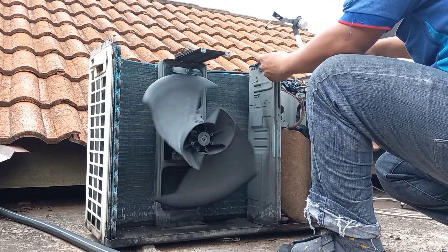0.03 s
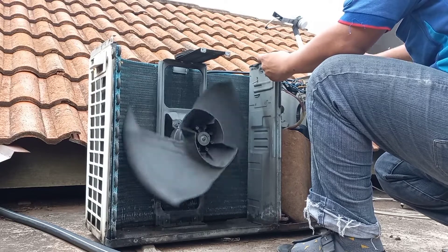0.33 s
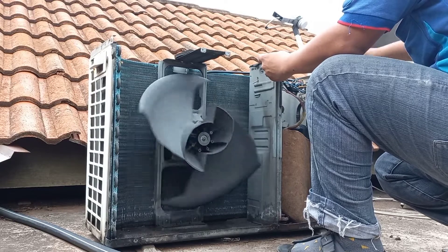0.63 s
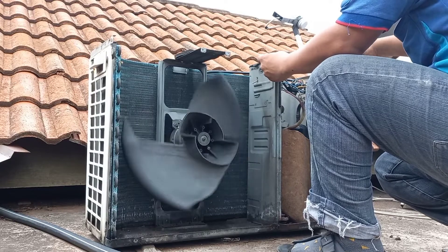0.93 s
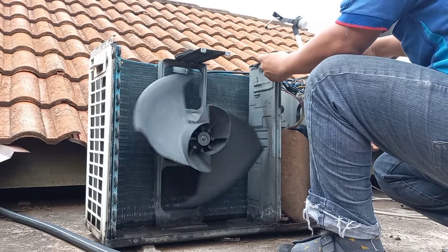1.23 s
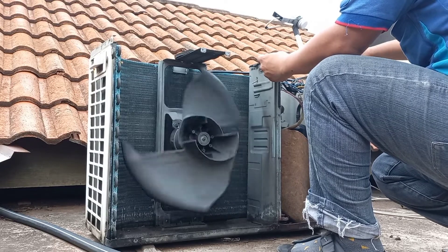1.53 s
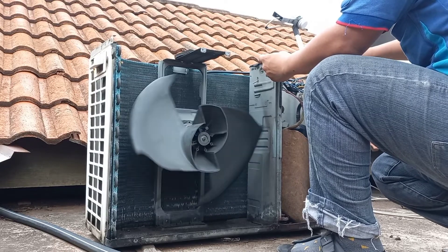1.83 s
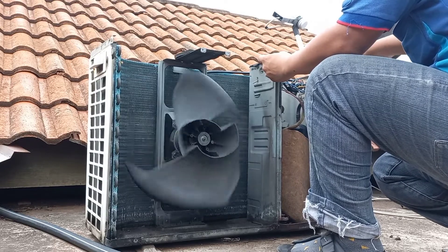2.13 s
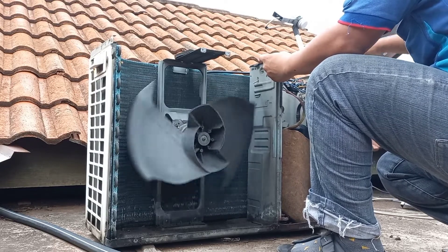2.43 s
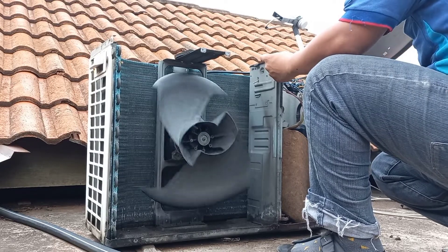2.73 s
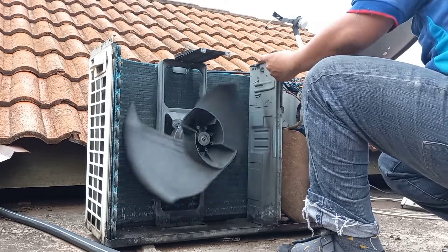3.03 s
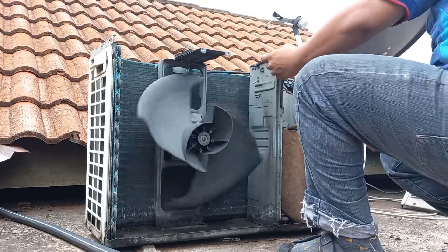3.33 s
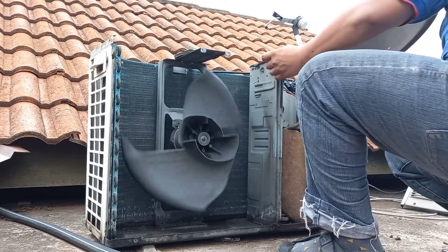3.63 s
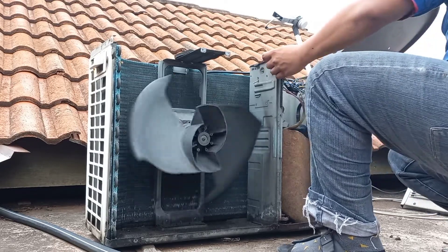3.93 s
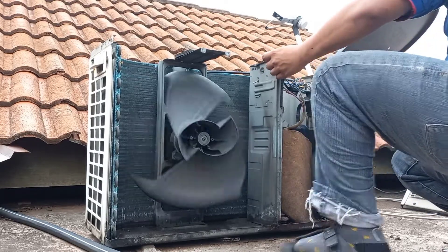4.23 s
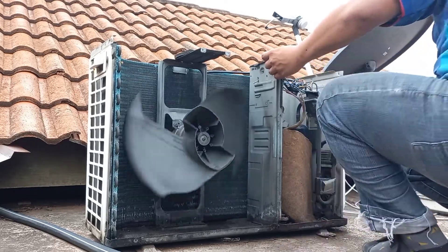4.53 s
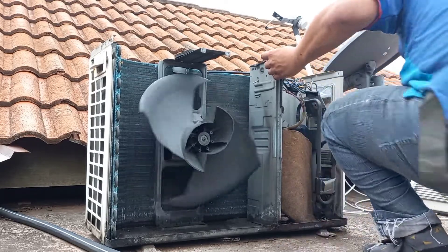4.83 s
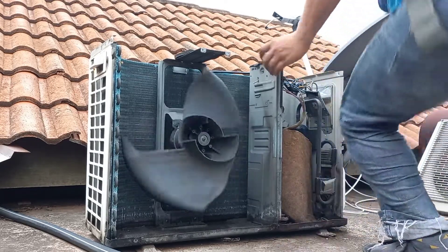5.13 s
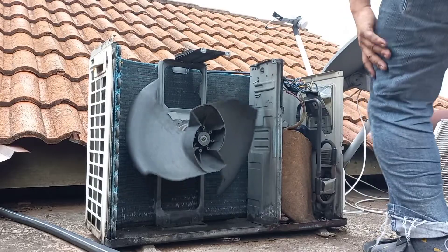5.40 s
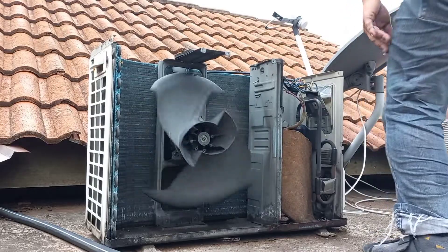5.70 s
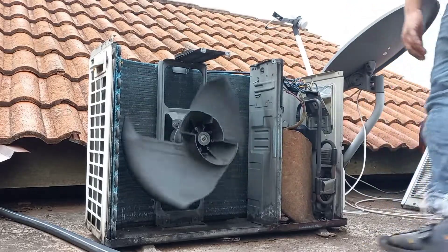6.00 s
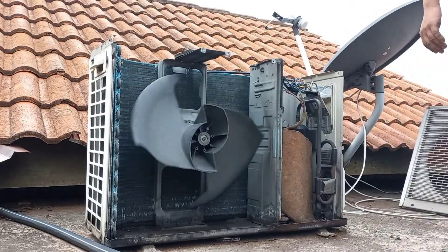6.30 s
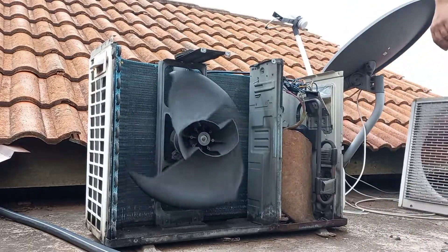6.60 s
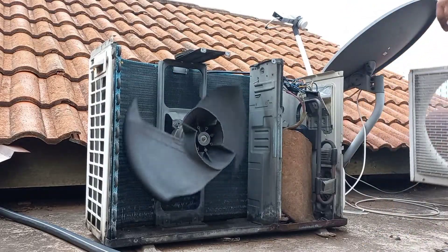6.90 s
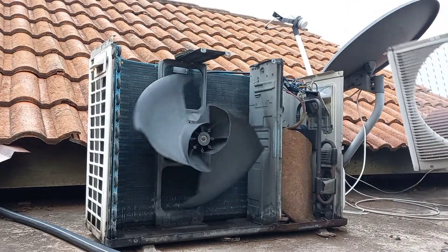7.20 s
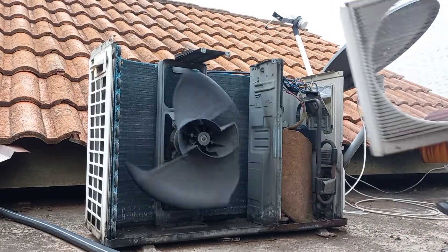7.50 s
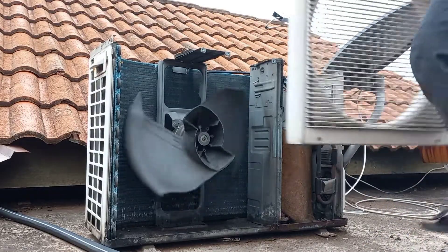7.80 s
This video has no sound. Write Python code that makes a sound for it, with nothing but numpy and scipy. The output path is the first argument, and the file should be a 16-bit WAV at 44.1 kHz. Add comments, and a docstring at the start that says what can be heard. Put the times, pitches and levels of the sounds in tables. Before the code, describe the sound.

Close thumps, clinks and sheet-metal clatter from work on a rooftop air conditioner, ending with scuffing shoes and a grille dragged with ringing bangs.

```python
"""A distant town rumbles around an open roof, with soft, dull thumps close to a stereo microphone.
Kneeling at an open air-conditioner unit, a worker bumps its cabinet, and small metal parts clink in his
hand. He rises, a loose panel clatters, and his soles scuff the sandy concrete. Then he drags a sheet-metal
grille away: it bangs, sticks and slips, and rings out. A machine hums nearby; a bird whistles once."""
import sys
import numpy as np
from scipy import signal
from scipy.fft import rfft, irfft, next_fast_len
from scipy.io import wavfile
from scipy.ndimage import map_coordinates

SR = 44100
rng = np.random.default_rng(int(sys.argv[2]) if len(sys.argv) > 2 else 0)


def waveform_to_disk(signal):
    """Save audio, clipped to [-1, 1], as 16-bit WAV at the path in sys.argv[1]."""
    frames = np.transpose(np.atleast_2d(signal))
    scaled = np.clip(frames, -1, 1) * 32767
    samples = np.round(scaled).astype(np.int16)
    wavfile.write(sys.argv[1], SR, samples)


N = 350595

# The grille's frame hits the concrete. Each row: start in seconds, body level in dB, edge level in dB.
GRILLE_BANGS = [(6.241, -34.5, -24), (6.261, -22.5, -29), (6.328, -17.5, -15), (6.383, -18.5, -23.5),
                (6.482, -24.5, -27.5), (6.657, -30, -31), (6.745, -45, -39.5), (7.032, -44, -59)]
# Pulls on the grille. Each row: start in seconds, hardest moment in seconds, level in dB.
GRILLE_PULLS = [(6.255, 6.49, -19), (7.03, 7.143, -55)]
# The side panel strikes its frame. Each row: start in seconds, body level in dB, edge level in dB.
PANEL_BLOWS = [(4.519, -33, -30.5), (4.529, -32.5, -51), (4.579, -18.5, -17), (4.607, -22.5, -24),
               (4.695, -41, -38), (4.794, -30.5, -30.5), (4.82, -29.5, -30), (4.991, -30, -36.5),
               (5.237, -46.5, -57)]
# Bumps on the cabinet. Each row: start in seconds, body and edge levels in dB, decay time in seconds.
CABINET_KNOCKS = [(.792, -48.5, -48, 0.3), (2.659, -18, -24, 0.2), (2.682, -23.5, -41, 0.2),
                  (4.112, -30.5, -61, 0.41)]
# Small contacts close to the microphone. Each row: start in seconds, level in dB.
STEEL_CLINKS = [(3.119, -30.5), (3.145, -26), (3.174, -31.5), (3.216, -38), (3.244, -37), (4.582, -22),
                (6.385, -20), (6.867, -36)]
DRY_TAPS = [(1.55, -48), (2.026, -47), (3.034, -31.5), (3.0823, -40.5), (4.1139, -24), (4.413, -43.5),
            (4.766, -33.5), (5.359, -34.5)]
HOLLOW_KNOCKS = [(3.671, -44), (4.241, -33.5), (5.359, -39), (5.815, -48.5), (5.985, -40), (7.542, -56.5),
                 (7.635, -58.5), (7.8121, -48.5)]
DULL_THUMPS = [(0.269, -39), (1.027, -41.5), (1.396, -42.5), (1.777, -40), (2.359, -42.5), (2.408, -36.5),
               (2.489, -40.5), (4.111, -25), (4.526, -27.5), (4.696, -28.5), (5.812, -42)]
# Shoes scuff the roof. Each row: start and length in seconds, sole level in dB, grit level in dB.
SHOE_SCUFFS = [(0.21, .14, -74, -74.5), (1.133, 0.17, -57.5, -70), (3.628, 0.27, -39, -77),
               (4.177, 0.21, -42.5, -59), (5.292, 0.17, -49, -60.5), (5.735, 0.44, -61, -68.5),
               (5.954, 0.23, -47.5, -70), (6.111, 0.59, -39.5, -50.5)]
# Single modes that stand out of the metal. Each row: frequency in Hz, level in dB.
GRILLE_RING = [(489, -7), (577, -1.5), (726, -2), (799, 1.5), (920, -5), (1326, -3), (1405, -6), (1469, -5),
               (1701, -1), (1870, -8), (2158, -4.5), (2395, -6), (2467, -8.5)]
PANEL_RING = [(611, 2.5), (1176, 5), (1387, 3.5), (1703, -0.5), (2105, -0.5), (2316, 0.5), (2449, -1.5),
              (2900, -8), (3671, -14), (3849, -8.5), (5030, -5.5)]
CABINET_RING = [(274, 1.5), (312, -5.5), (382, -1.5), (527, 0.5), (748, -8.5), (1224, -7), (1490, -8.5),
                (2200, -4)]
STEEL_RING = [(2350, -12), (3570, -9.5), (4772, -3.5), (5243, -7), (6244, -2.5), (6626, -7.5), (7565, -7),
              (9600, -9), (12900, 4), (13150, -3), (14850, -5.5)]
# The dense resonances of each sheet-metal body. Each row: frequency in Hz, spectral level in dB.
GRILLE_BODY = [(90, -49.5), (200, -7), (350, -22), (520, -7), (800, 1), (1100, -7), (1500, -0.5),
               (2000, -9.5), (2500, -11), (3600, -20.5), (6000, -29.5)]
PANEL_BODY = [(150, -8), (300, -13.5), (450, -8), (650, 2), (1000, -8.5), (1400, -3.5), (1900, -7),
              (2400, -6), (3200, -17), (6000, -22)]
CABINET_BODY = [(90, -14), (190, -2.5), (300, 6.5), (480, -2.5), (800, -4.5), (1400, -6.5), (2300, -15.5),
                (3500, -27.5), (6000, -36)]
# Noise colours of the close contacts and the far town. Each row: frequency in Hz, spectral level in dB.
EDGE_COLOUR = [(1800, -3), (3500, -3), (4800, -5), (8000, -3), (11000, -3.5), (13000, -3.5), (15500, -12.5)]
TAP_COLOUR = [(700, -15), (2200, 5.5), (4000, -1), (8000, -6), (15000, -26.5)]
HOLLOW_COLOUR = [(500, -14), (1500, 2.5), (2500, -4.5), (4200, -24), (12000, -16)]
DULL_COLOUR = [(120, -21.5), (250, 7.5), (750, 3.5), (1100, -4), (1500, -0.5), (4000, -21.5), (9000, -28.5)]
GRIT_COLOUR = [(1500, -26.5), (3500, 6), (7000, 6.5), (12000, 0.5), (15500, -6)]
TOWN_COLOUR = [(25, -29.5), (52, -11.5), (75, -10), (93, 0.5), (163, -7.5), (286, -8.5), (450, -11.5),
               (790, -25.5), (1460, -31.5), (2500, -52), (5000, -56), (15000, -57)]
# The tones of the nearby machine. Each row: frequency in Hz, level in dB.
HUM_TONES = [(457.5, -69), (484.5, -60.5)]
# How alike near and far sounds are left and right. Each row: frequency in Hz, likeness from 0 to 1.
NEAR_LIKENESS = [(200, 0.97), (800, 0.69), (2000, 0.53), (4000, 0.083), (12000, 0.2)]
FAR_LIKENESS = [(80, 0.98), (300, 0.82), (700, 0.25), (1500, 0.074), (8000, .2)]
# The microphone's lean to the left. Each row: frequency in Hz, left minus right in dB.
LEFT_BIAS = [(100, 1), (350, 4), (800, 2), (2300, 1.5), (5000, 0.5), (13000, 4.5)]

TIPPED_S, STANDING_T60_S, TIPPED_T60_S = 6.3, 0.47, 0.85  # tipped off the ground, the grille rings longer
LINGER_HZ, LINGER_DB, LINGER_T60_S = 805, -31, 2  # the grille's longest mode
PULL_DB_PER_S, EASE_DB_PER_S = 32.5, 62  # the judder swells, then eases as the weight leaves the ground
SAND_DB, SAND_CLEARS_DB_PER_S = -11, 59  # sand cracks most at the start of a pull
LET_GO_S, HELD_T60_S, FREE_T60_S = 4.75, 0.27, 0.63  # the hand damps the panel until it lets go
CLINK_T60_S = 0.18
SOFT_THUMP_HZ, FIRM_THUMP_DB, FIRMING = 740, -30.5, 9.5  # the cutoff climbs steeply on a firm thump
TOWN_DB, DRONE_DB = -47.5, -52  # far rumble and its deep drone
# The background rumble dips after the loud bangs, then recovers.
DIP_START_S, DIP_BOTTOM_S, DIP_DB, RECOVER_DB_PER_S = 6.2, 7.36, 11.5, 11.5
DRONE_DIPS, HUM_DIPS = 4.2, 0.25  # times as far as the rumble, in dB
TOP_HZ = 15500  # the microphone's band limit


def grille():
    """Close by, the frame bangs down, then sticks and slips over the concrete; one mode lingers."""
    blows = [(s, body_db, edge_db, STANDING_T60_S if s < TIPPED_S else TIPPED_T60_S)
             for s, body_db, edge_db in GRILLE_BANGS]
    bangs = struck(blows, GRILLE_BODY, GRILLE_RING, dense_db=0, ring_db=-4, ring_life=1.05,
                   damp_hz=1300, edge_t60=0.13, rattle_db=-12)
    add(bangs, TIPPED_S, amp(LINGER_DB) * rasp([(LINGER_HZ, 0)], LINGER_T60_S, width=.025))
    slips = np.zeros((2, N))
    for corner in range(4):  # each corner catches on its own and rings the frame differently
        body = burst(list(GRILLE_BODY) + [(9000, -37.5)], 0.03)
        modes = amp(-10) * ring(GRILLE_RING, 0.23, damp_hz=2000, detune=0.0067)
        catches = pulses(50, spread_db=-0.5)
        slips += signal.fftconvolve(catches[None], body + modes, axes=1)[:, :N]
    judder, sand = pull_gains()
    drag = judder * unit(slips) + sand * grit(600, spread_db=8.5)
    return placed(bangs + drag, NEAR_LIKENESS, lag_ms=0.371)


def pull_gains():
    """Gains of the judder, which swells and eases with each pull, and of the sand, soon swept aside."""
    t, judder, sand = np.arange(N) / SR, np.zeros(N), np.zeros(N)
    for start, hardest, db in GRILLE_PULLS:
        slack_db = np.maximum(PULL_DB_PER_S * (hardest - t), EASE_DB_PER_S * (t - hardest))
        judder += (t > start) * amp(db - slack_db)
        sand += (t > start) * amp(db + SAND_DB - SAND_CLEARS_DB_PER_S * np.abs(t - start))
    return judder, sand


def panel():
    """A loose panel near the microphone rocks and clatters as the worker gets up."""
    blows = [(s, body_db, edge_db, HELD_T60_S if s < LET_GO_S else FREE_T60_S)
             for s, body_db, edge_db in PANEL_BLOWS]
    clatter = struck(blows, PANEL_BODY, PANEL_RING, dense_db=0.5, ring_db=-3.5, ring_life=1.066,
                     damp_hz=5410, edge_t60=0.1, rattle_db=-6)
    return placed(clatter, NEAR_LIKENESS, lag_ms=0.372)


def cabinet():
    """Almost straight ahead, the heavy cabinet answers each bump with a dull, short knock."""
    knocks = struck(CABINET_KNOCKS, CABINET_BODY, CABINET_RING, dense_db=-0.5, ring_db=-0.5,
                    ring_life=1.44, damp_hz=1370, edge_t60=0.058, rattle_db=-16)
    return placed(knocks, NEAR_LIKENESS, lag_ms=0.051)


def small_parts():
    """Close up, bits of steel clink and rub; dry taps sound, and loose parts give hollow knocks."""
    out = np.zeros((2, N))
    for s, db in STEEL_CLINKS:
        chime = amp(-10) * ring(STEEL_RING, CLINK_T60_S, damp_hz=9000, detune=.008)
        rub = amp(-5) * rasp(STEEL_RING, CLINK_T60_S, width=.015)
        contact = amp(6) * rasp(STEEL_RING, .028, width=0.0078) + amp(-3.5) * burst(EDGE_COLOUR, 0.02)
        sizzle = amp(-9.5) * burst(EDGE_COLOUR, CLINK_T60_S)
        add(out, s, amp(db) * (chime + rub + contact + sizzle))
    for s, db in DRY_TAPS:
        tap = amp(-4.5) * burst(TAP_COLOUR, 0.017) + amp(-20.5) * burst(TAP_COLOUR, 0.15)
        add(out, s, amp(db) * tap)
    for s, db in HOLLOW_KNOCKS:
        add(out, s, amp(db) * burst(HOLLOW_COLOUR, 0.059))
    return placed(out, NEAR_LIKENESS, lag_ms=0.23)


def thumps():
    """Soft, dull thumps close by, then a few firmer, brighter ones."""
    out = np.zeros((2, N))
    for s, db in DULL_THUMPS:
        corner_hz = SOFT_THUMP_HZ * (1 + amp(db - FIRM_THUMP_DB) ** FIRMING)
        noise = coloured(rng.standard_normal((2, SR)), DULL_COLOUR)
        thud = filtered(noise, lambda hz: 1 / (1 + (hz / corner_hz) ** 2))
        add(out, s, amp(db) * unit(thud) * fade(0.25, attack=0.001))
    return placed(out, NEAR_LIKENESS, lag_ms=0.25)


def shoes():
    """Beside the microphone, soles scuff the sandy concrete."""
    out = np.zeros((2, N))
    rub = coloured(np.array([pulses(1500, spread_db=3), pulses(1500, spread_db=3)]), DULL_COLOUR)
    sand = grit(2700, spread_db=7.5)
    for s, length, sole_db, grit_db in SHOE_SCUFFS:
        stroke = np.clip((np.arange(N) / SR - s) / length, 0, 1)
        pressure = np.sin(np.pi * stroke ** 0.6) ** 2  # quick start, slower release
        out += pressure * (amp(sole_db) * rub + amp(grit_db) * sand)
    return placed(out, NEAR_LIKENESS, lag_ms=0.25)


def grit(rate, spread_db):
    """Sand grains crack under something sliding."""
    return coloured(np.array([pulses(rate, spread_db), pulses(rate, spread_db)]), GRIT_COLOUR)


def town():
    """Far beyond the roof, a rumble with an uneven deep drone and a thin whine."""
    dip_db = background_dip()
    rumble_gain = amp(TOWN_DB - dip_db + .6 * wobble(5))
    drone_gain = amp(DRONE_DB - DRONE_DIPS * dip_db)
    rumble = amp(2) * coloured(rng.standard_normal((2, N)), TOWN_COLOUR)
    whine = amp(-45.5) * band(7450, width_hz=500)
    drone = band(85.7, width_hz=26) * amp(0.52 * wobble(1.8))
    return placed(rumble_gain * (rumble + whine) + drone_gain * drone, FAR_LIKENESS, lag_ms=0)


def machine_hum():
    """A machine nearby runs on, its tones wavering a little."""
    t = np.arange(N) / SR
    tones = sum(amp(db + 1.5 * wobble(4)) * np.sin(2 * np.pi * hz * t + .7 * wobble(4))
                for hz, db in HUM_TONES)
    return np.sqrt(2) * tones * amp(-HUM_DIPS * background_dip())


def bird():
    """One faint, thin whistle in the centre that falls fast and levels off."""
    t = np.arange(SR // 5) / SR
    hz = 3420 + 1500 * np.exp(-t / .048)
    envelope = np.interp(t, [0, .015, .14, t[-1]], [0, 0.91, 0.2, 0.19])
    note = envelope * np.sin(2 * np.pi * np.cumsum(hz) / SR)
    out = np.zeros((2, N))
    add(out, 7.29, amp(-67.5) * np.array([note, note]))
    return out


def background_dip():
    """How far the background rumble has dipped, in dB."""
    t = np.arange(N) / SR
    fall = np.interp(t, [DIP_START_S, DIP_BOTTOM_S], [0, DIP_DB])
    return fall - RECOVER_DB_PER_S * np.maximum(t - DIP_BOTTOM_S, 0)


def struck(blows, colour, modes, dense_db, ring_db, ring_life, damp_hz, edge_t60, rattle_db):
    """Blows on sheet metal: the dense body, its clear modes, a brief bright edge and a rattle."""
    out = np.zeros((2, N))
    for s, body_db, edge_db, t60 in blows:
        dense = amp(dense_db) * burst(list(colour) + [(9000, -43.0)], t60)
        clear = amp(ring_db) * ring(modes, t60 * ring_life, damp_hz)
        edge = burst(EDGE_COLOUR, edge_t60) + amp(rattle_db) * rattle(0.65 * t60)
        add(out, s, amp(body_db) * (dense + clear) + amp(edge_db) * edge)
    return out


def rattle(t60):
    """After a blow, loose edges keep chattering against each other."""
    contacts = pulses(160, spread_db=4.5)[None, :SR]
    chatter = signal.fftconvolve(contacts, burst(EDGE_COLOUR, 0.03), axes=1)[:, :SR]
    return unit(chatter) * fade(t60)


def burst(colour, t60):
    """Countless close resonances dying together: two independent draws."""
    return coloured(rng.standard_normal((2, SR)), colour) * fade(t60)


def ring(modes, t60, damp_hz, detune=.003, scatter_db=2):
    """Clear modes, each a close beating pair, struck at new strengths every time: two draws."""
    hz, db = np.repeat(modes, 2, axis=0).T
    hz = hz * (1 + detune * rng.standard_normal(len(hz)))
    strength = amp(db + scatter_db * rng.standard_normal((2, len(hz))))
    phase = np.exp(2j * np.pi * rng.random((2, len(hz))))
    lines = np.zeros((2, SR // 2 + 1), complex)
    lines[:, np.round(hz).astype(int)] = strength * phase
    lines /= np.std(irfft(lines, SR))
    lasting = 1 / (1 + (np.arange(SR // 2 + 1) / damp_hz) ** 6)  # modes above damp_hz die twice as fast
    return irfft(lines * lasting, SR) * fade(t60) + irfft(lines * (1 - lasting), SR) * fade(t60 / 2)


def rasp(modes, t60, width):
    """Modes blurred into rough bands, as when parts rub while they ring: two independent draws."""
    hz, db = np.transpose(modes)[:, :, None]
    bands = lambda f: np.sqrt(np.sum(amp(db) ** 2 / hz / (1 + ((f / hz - 1) / width) ** 4), axis=0))
    return unit(filtered(rng.standard_normal((2, SR)), bands)) * fade(t60)


def band(hz, width_hz):
    """A narrow band of noise: two independent draws."""
    noise = rng.standard_normal((2, N))
    return unit(filtered(noise, lambda f: 1 / (1 + ((f - hz) / (width_hz / 2)) ** 4)))


def pulses(rate, spread_db):
    """Contacts of uneven size at random moments, about rate a second."""
    contacts = (rng.random(N) < rate / SR) * rng.choice([-1, 1], N)
    return contacts * amp(spread_db * rng.standard_normal(N))


def placed(pair, likeness, lag_ms):
    """Two draws become the microphone's left and right; the left hears the sound lag_ms later."""
    turn = lambda hz: np.arccos(np.clip(along(likeness, hz), -1, 1)) / 2
    mid, side = filtered(pair, lambda hz: np.array([np.cos(turn(hz)), np.sin(turn(hz))]))
    delay = lambda hz: np.exp(np.outer([-1, 1], 1j * np.pi * hz * lag_ms / 1000))
    return filtered(np.array([mid + side, mid - side]), delay)


def reflected(x, echo_db, count=7):
    """Tiles, floor and cabinet send the treble back within milliseconds and comb it."""
    paths = np.zeros((2, SR // 50))
    for side in paths:
        side[rng.integers(SR // 1000, SR // 70, count)] = rng.choice([-1, 1], count) / np.sqrt(count)
    treble = filtered(x, lambda hz: hz ** 2 / (hz ** 2 + 1500 ** 2))
    return x + amp(echo_db) * signal.fftconvolve(treble, paths, axes=1)[:, :N]


def fade(t60, attack=0.00099):
    """One second of a struck thing's envelope, falling 60 dB in t60 seconds."""
    t = np.arange(SR) / SR
    return np.exp(-np.log(1000) * t / max(t60, .005)) * (1 - np.exp(-t / attack))


def wobble(rate):
    """A smooth random curve, rate knots a second."""
    return map_coordinates(rng.standard_normal(int(N * rate / SR) + 4), [np.arange(N) * rate / SR])


def coloured(x, colour):
    """x with a (Hz, dB) colour, at rms 1."""
    return unit(filtered(x, lambda hz: amp(along(colour, hz))))


def filtered(x, response):
    """x through a frequency response."""
    size = x.shape[-1]
    padded = next_fast_len(size + 8192)
    return irfft(rfft(x, padded) * response(np.fft.rfftfreq(padded, 1 / SR)), padded)[..., :size]


def along(points, hz):
    """(Hz, value) points read on a log axis."""
    knots_hz, values = np.transpose(points)
    return np.interp(np.log(hz + 1), np.log(knots_hz + 1), values)


def add(track, s, sound):
    """Mixes a sound in at s seconds."""
    part = track[:, max(round(s * SR), 0):][:, :sound.shape[1]]
    part += sound[:, :part.shape[1]]


def amp(db):
    """Decibels to gain."""
    return 10 ** (np.asarray(db) / 20)


def unit(x):
    """Scaled to rms 1."""
    return x / np.sqrt(np.mean(x ** 2) + 1e-20)


def scene():
    """The open roof: close sounds and their reflections in front, town, machine and bird behind."""
    close = cabinet() + panel() + grille() + small_parts() + thumps() + shoes()
    near = reflected(close, echo_db=-2)
    return amp(-1) * near + town() + machine_hum() + bird()


def record(dry):
    """The microphone is more sensitive on the left, cuts the deep bass and stops at its band limit."""
    balance = lambda hz: amp(np.outer([.5, -.5], along(LEFT_BIAS, hz)))
    bass_cut = lambda hz: hz ** 4 / (hz ** 4 + 45 ** 4)
    top_cut = lambda hz: np.clip((TOP_HZ - hz) / 500 + .5, 0, 1)
    return filtered(dry, lambda hz: balance(hz) * bass_cut(hz) * top_cut(hz))


dry = scene()
out = record(dry)
waveform_to_disk(out)
```